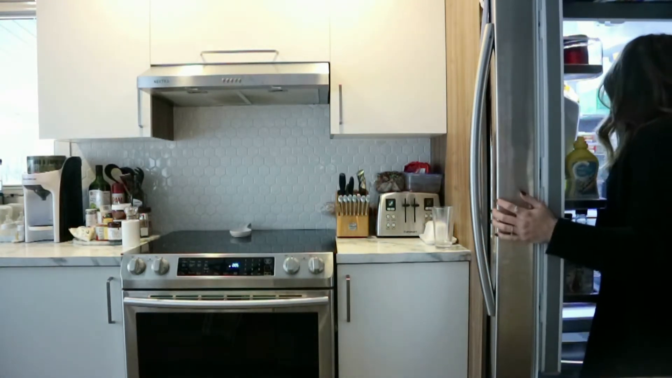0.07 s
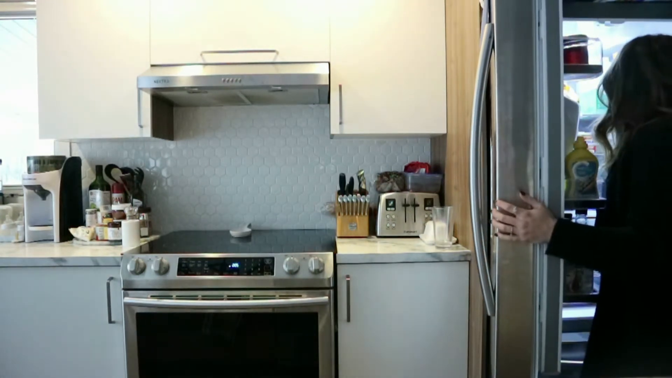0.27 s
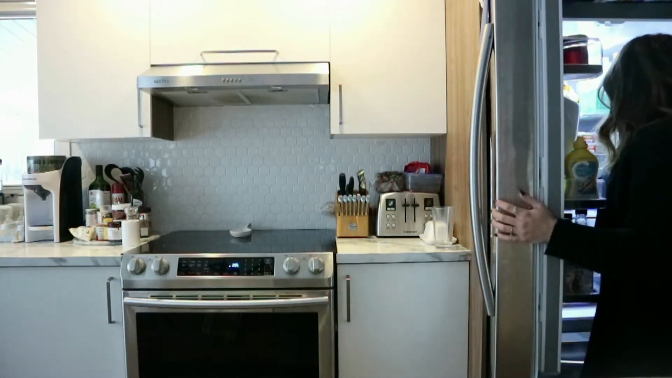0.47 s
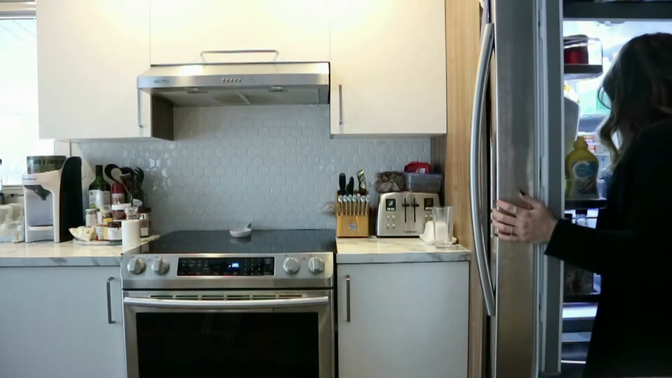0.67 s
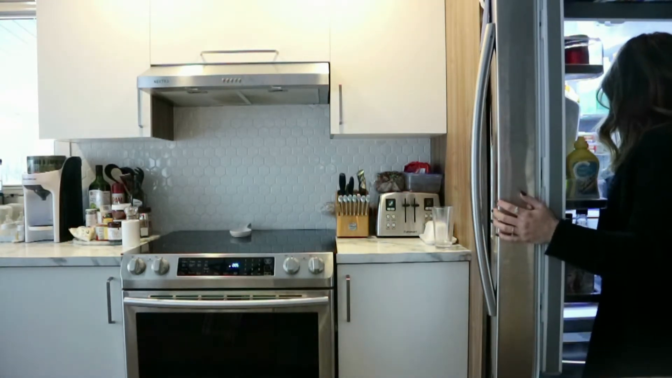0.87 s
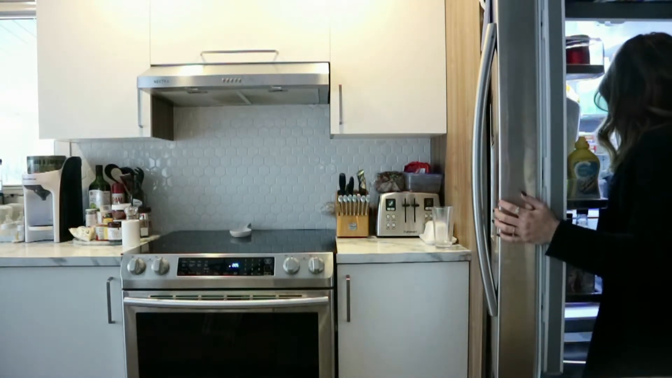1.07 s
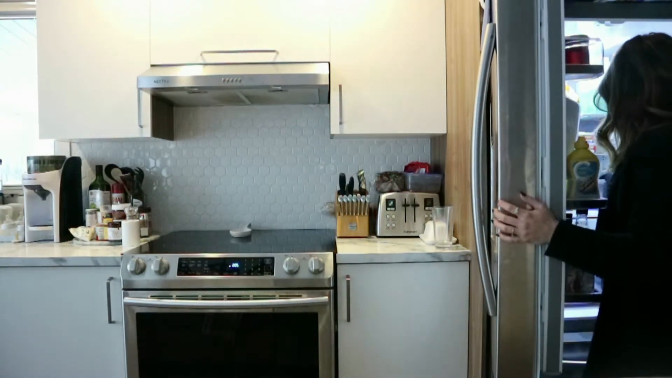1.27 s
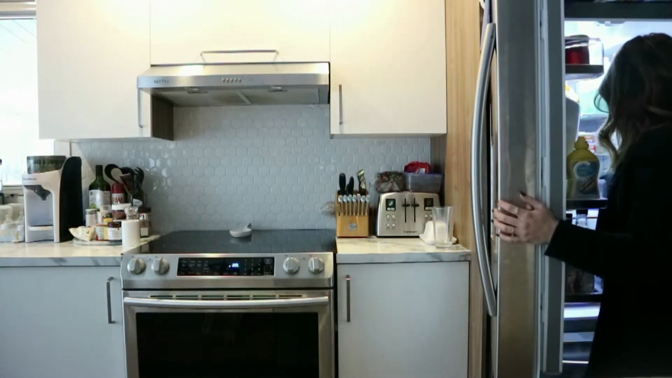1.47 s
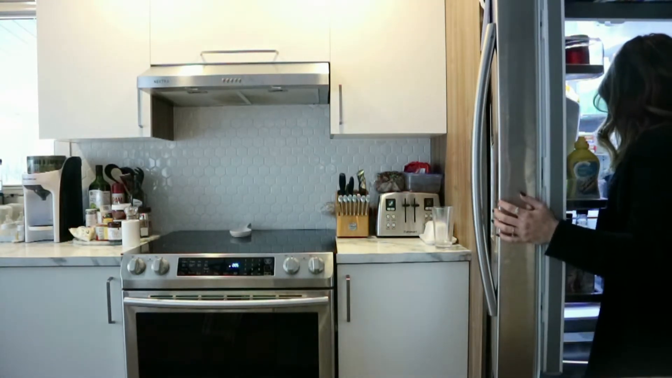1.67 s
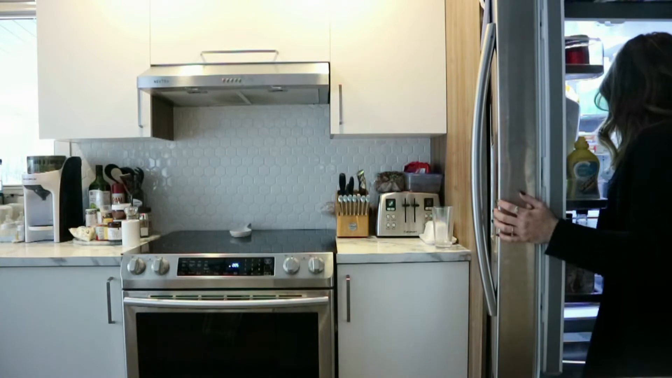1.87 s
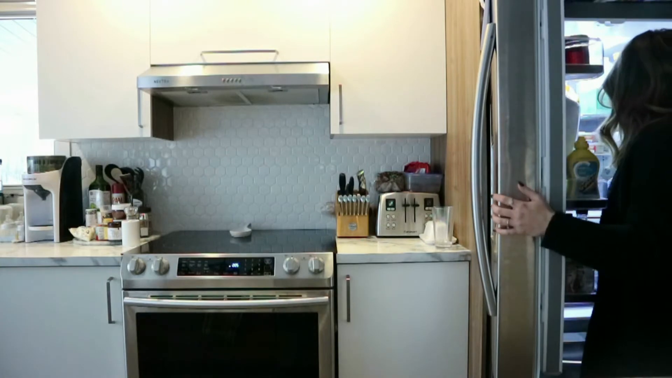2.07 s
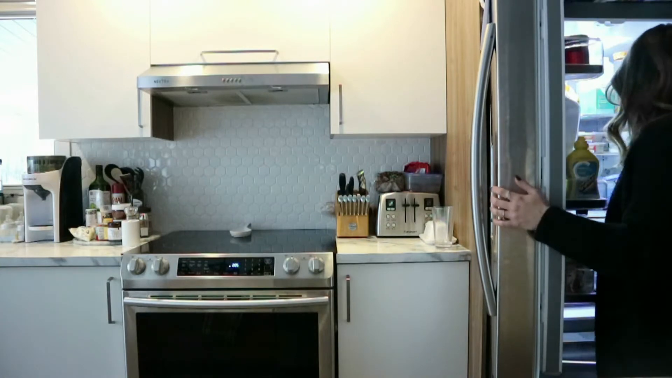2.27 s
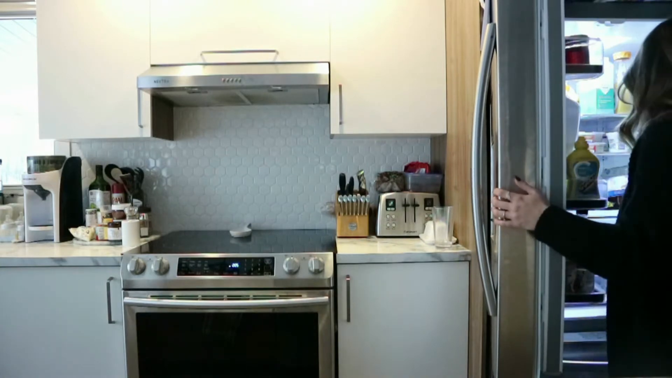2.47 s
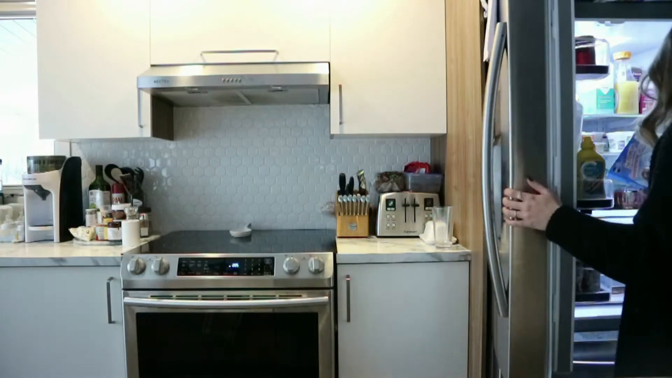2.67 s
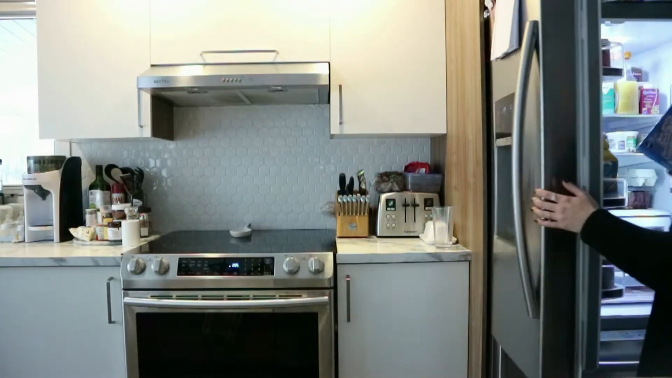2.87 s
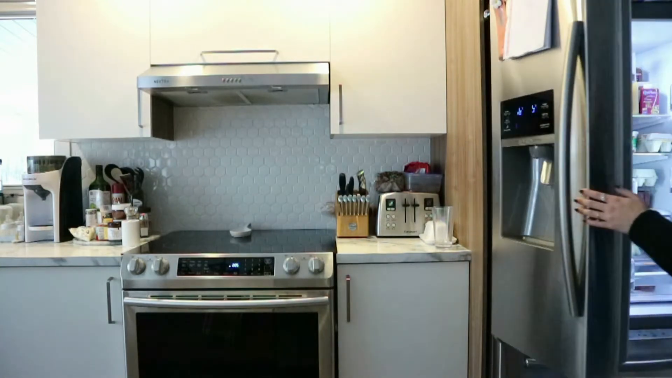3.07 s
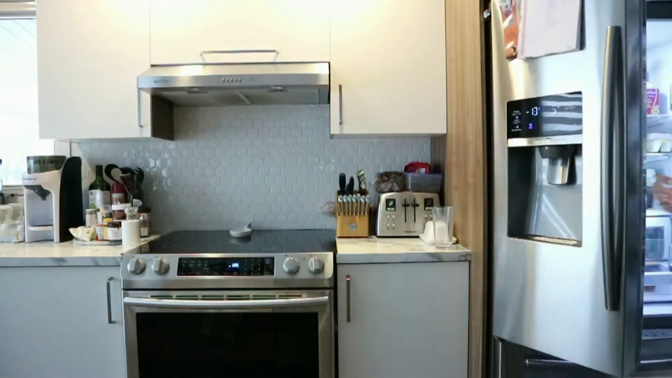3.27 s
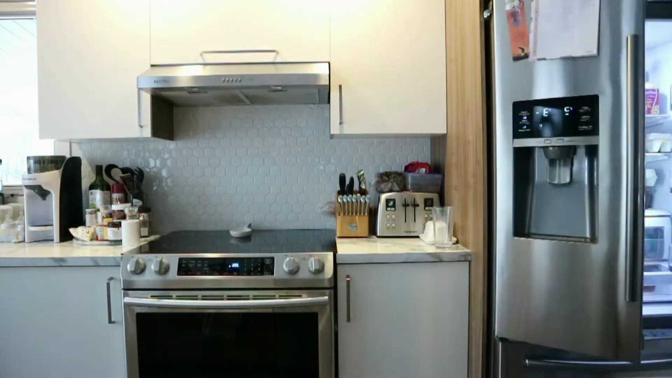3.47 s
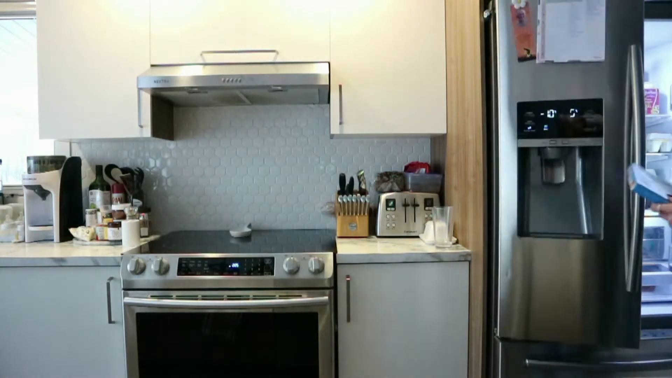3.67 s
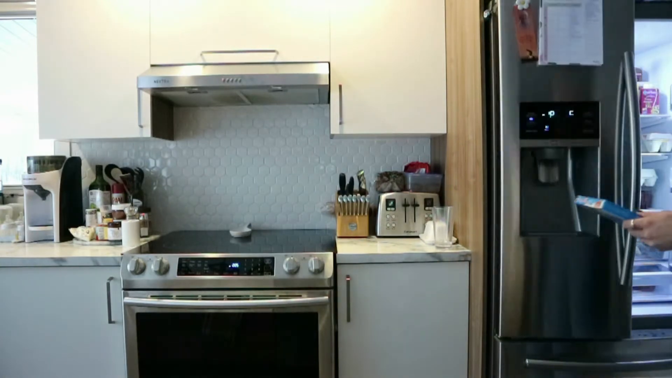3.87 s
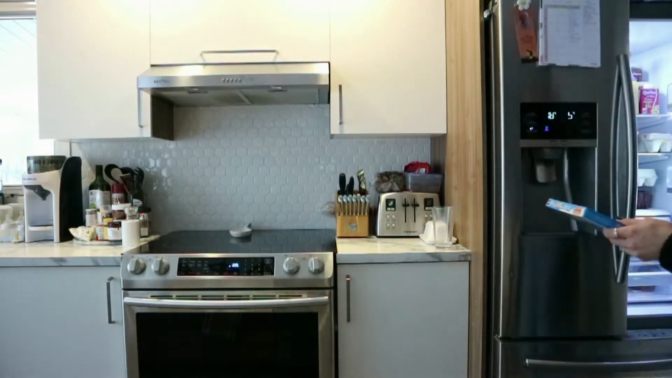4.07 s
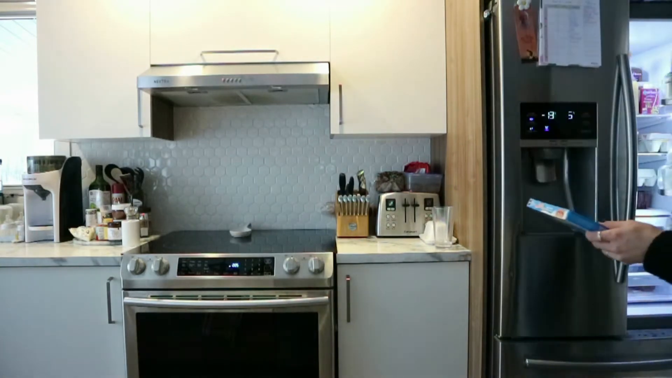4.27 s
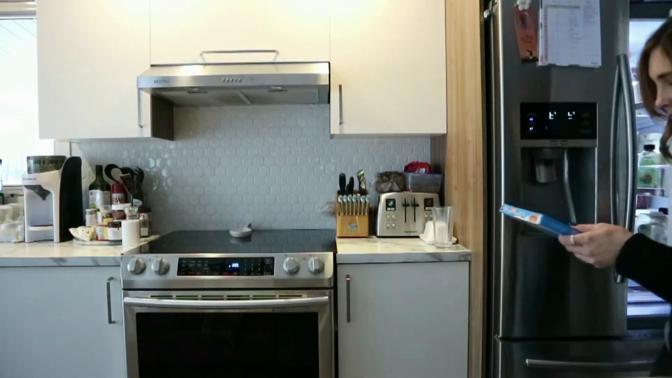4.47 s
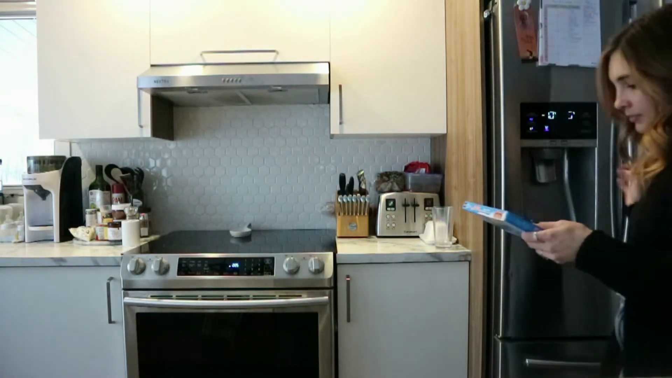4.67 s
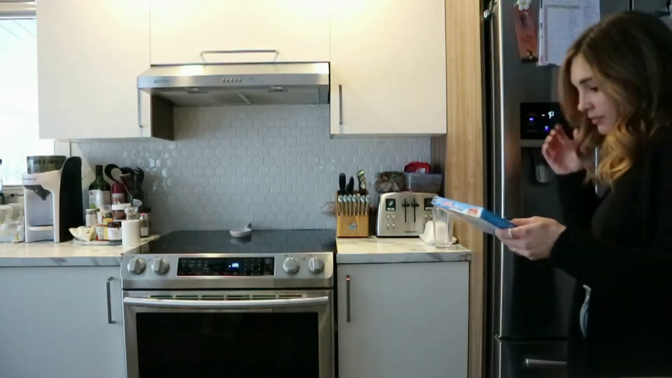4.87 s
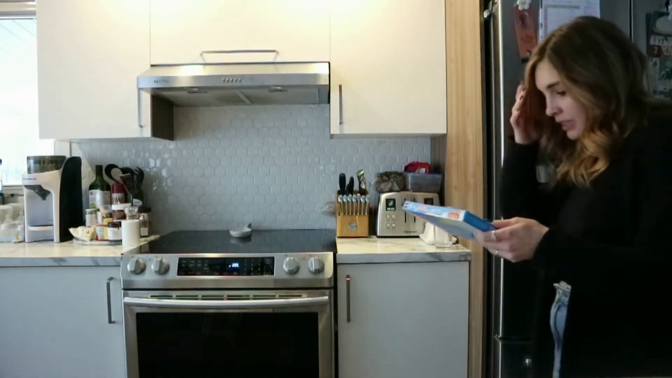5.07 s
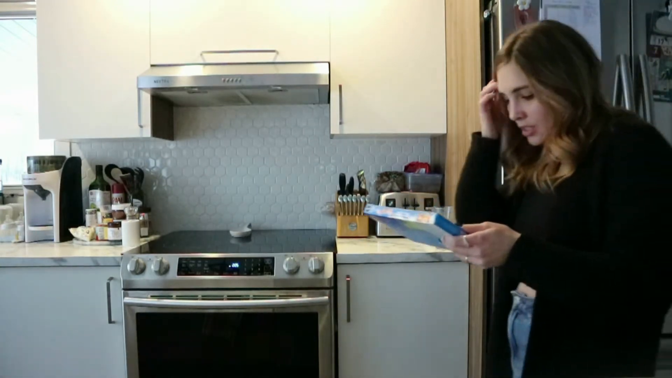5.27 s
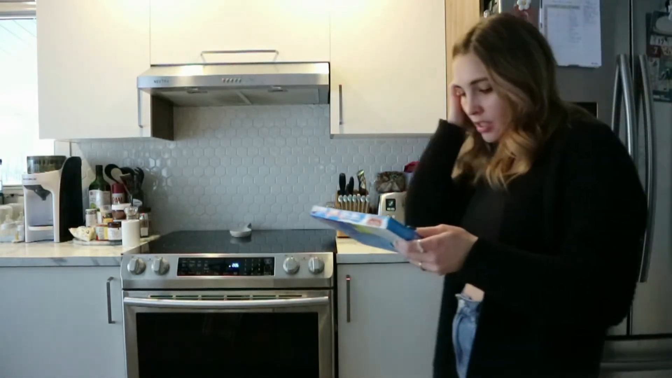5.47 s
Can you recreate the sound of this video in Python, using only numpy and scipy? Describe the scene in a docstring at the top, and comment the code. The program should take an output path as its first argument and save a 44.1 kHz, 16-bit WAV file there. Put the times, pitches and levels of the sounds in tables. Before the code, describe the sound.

Packets crinkle and plastic snaps as someone rummages in a refrigerator, a cardboard box scrapes out, then one door rattles shut and another slams.

```python
"""Packets crinkle as someone rummages in a two-door refrigerator in a small, hard-walled kitchen.
Plastic snaps, containers knock on the shelves, and a cardboard box is dragged out with a stick-slip scrape.
The first door swings shut and its bottles and jars rattle; then the second door slams.
Rubbing is coloured grains, blows are ringing modes plus fading noise; dense echoes surround most of it."""
import sys
import numpy as np
from scipy import signal
from scipy.fft import rfft, irfft
from scipy.io import wavfile
from scipy.ndimage import map_coordinates

SR = 44100
rng = np.random.default_rng(int(sys.argv[2]) if len(sys.argv) > 2 else 0)


def master_out(mix):
    """Clip the mix to full scale and print it as 16-bit PCM to the path in sys.argv[1]."""
    frames = np.transpose(np.atleast_2d(mix))
    ceiling = np.clip(frames, -1, 1)
    pcm = np.round(ceiling * 32767).astype(np.int16)
    wavfile.write(sys.argv[1], SR, pcm)


N = 242855
TIME = np.arange(N) / SR  # s
HZ = np.arange(N // 2 + 1) * SR / N  # bins of a full-length spectrum

# Hand taking hold of something. Each row: start in seconds, length in seconds, crinkle level in dB,
# treble in dB relative to it, papery rub in dB relative to it, shuffle on the shelf in dB.
GRABS = [(-0.015, 0.16, -40.5, -4, -6.5, -55.5), (0.088, 0.17, -42.5, 1, -3, -42),
         (0.283, 0.17, -49.5, -18, -2, -49), (0.477, 0.13, -46.5, -2.5, -3.5, -49),
         (0.606, 0.055, -45, -5, -2, -52), (0.655, 0.15, -46.5, -10, 0, -44.5),
         (0.868, 0.1, -52.5, -1, 3.5, -45), (1.088, 0.024, -50.5, -20, 2, -52),
         (1.16, 0.23, -60, -5, 1, -54.5), (1.396, 0.07, -49, -6, 3, -40),
         (1.54, 0.16, -51, -4.5, -0.5, -48.5), (1.727, 0.23, -49, -5, -1.5, -46.5),
         (2.538, 0.29, -49.5, -7.5, -4.5, -82), (2.733, 0.042, -44.5, -5, -4, -81),
         (2.84, 0.3, -51.5, -9.5, -4.5, -58), (3.474, 0.72, -46.5, -10.5, -2, -54),
         (4.483, 0.027, -43, -7, -8.5, -69), (4.54, 0.087, -61.5, -2, 2.5, -49.5),
         (4.75, 0.089, -46, -20, 3, -49), (4.84, 0.45, -50.5, -11, 3.5, -42.5),
         (5.253, 0.26, -55.5, -14, -6.5, -53), (5.411, 0.014, -49, -3, -15, -44)]
# Pull on the box as it leaves its shelf. Each row: time in seconds, level in dB.
BOX_PULL = [(2.02, -39.5), (2.076, -38.5), (2.084, -33.5), (2.168, -33), (2.184, -31), (2.294, -38.5),
            (2.422, -28), (2.432, -27), (2.52, -45.5)]
# Spectrum of the first door's clattering liner. Each row: frequency in Hz, level in dB.
FIRST_LINER = [(30, -28), (60, -8), (95, -2), (170, -1.5), (270, 0.5), (380, -1), (510, 1), (750, -7),
               (1100, -4), (1700, -9.5), (2700, -15.5), (4000, -24.5), (8000, -34), (14000, -80)]


def amp(db):
    """Decibels to gain."""
    return 10 ** (np.asarray(db) / 20)


def unit(x):
    """Scale to standard deviation 1."""
    return x / np.std(x)


def decay(t, t60):
    """Exponential fade by 60 dB in t60 seconds."""
    return np.exp(-np.log(1000) * t / t60)


def lookup(points, hz):
    """Interpolate a table on a log-frequency axis."""
    f, value = np.transpose(points)
    return np.interp(np.log(hz + 1e-3), np.log(f), value)


def band(x, lo_hz, hi_hz, order=3):
    """Butterworth band-pass."""
    edges_hz = [lo_hz, min(hi_hz, SR / 2 - 1)]
    return signal.sosfilt(signal.butter(order, edges_hz, "band", fs=SR, output="sos"), x)


def convolve(x, response):
    """Play a sound through an impulse response."""
    return signal.fftconvolve(x, response)[:N]


def colour(x, spectrum, size=4096):
    """Minimum-phase filter of unit energy shaped by (Hz, dB) rows."""
    gain = amp(lookup(spectrum, np.arange(size // 2 + 1) * SR / size))
    # fold the cepstrum to make the filter causal
    cepstrum = irfft(np.log(gain))
    cepstrum[1:size // 2] *= 2
    cepstrum[size // 2 + 1:] = 0
    response = irfft(np.exp(rfft(cepstrum)))
    return convolve(x, response / np.linalg.norm(response))


def grains(rate, spread_db):
    """Tiny slips and buckles of unequal size, rate per second on average; scaled to unit deviation."""
    size = amp(spread_db * np.minimum(rng.exponential(size=N), 4))
    happens = rng.random(N) < rate / SR
    return unit(happens * size * rng.choice([-1, 1], N))


def chatter(times, dbs, t60, rise_s=0.00047):
    """Each contact sets off vibrations too dense to tell apart: noise dying away as one."""
    power, t = np.zeros(N), TIME[:SR]
    np.add.at(power, (times * SR).astype(int), amp(dbs) ** 2)
    power_fade = (1 - np.exp(-t / rise_s)) * decay(t, t60) ** 2
    return np.sqrt(np.abs(convolve(power, power_fade))) * rng.standard_normal(N)


def ring(times, dbs, modes):
    """Blows ring the modes of one object as decaying sines."""
    blows, t = np.zeros(N), TIME[:SR]
    np.add.at(blows, (times * SR).astype(int), amp(dbs))
    response = sum(amp(db - 60 * t / t60) * np.sin(2 * np.pi * hz * t) for hz, db, t60 in modes)
    return convolve(blows, response / np.linalg.norm(amp(np.array(modes)[:, 1])))


def clumps(depth_db, lo_hz, hi_hz):
    """Gain that jumps about as a surface catches and gives way; rms 1."""
    gain = amp(depth_db * unit(band(rng.standard_normal(N), lo_hz, hi_hz, order=2)))
    return gain / np.sqrt(np.mean(gain ** 2))


def swell(rows, lead_s=0.012, fade_s=0.025):
    """Gain curve through (s, dB) rows, fading exponentially beyond its ends."""
    s, db = np.transpose(rows)
    outside = np.maximum((s[0] - TIME) / lead_s, (TIME - s[-1]) / fade_s).clip(0)
    return amp(np.interp(TIME, s, db)) * np.exp(-outside)


def stroke(start, length, attack_s, slope_db_per_s, release_s):
    """Gain of one movement: attack, a hold that slopes in level, release."""
    t = TIME - start
    attack = (t / attack_s).clip(0, 1)
    hold = amp(slope_db_per_s * t.clip(0, length))
    return attack * hold * np.exp(-(t - length).clip(0) / release_s)


def handling(dbs, attack_share=0.13, ease_db_per_s=9, release_s=0.024):
    """Power-summed gain of all grabs: each tightens over a share of its length, eases off, lets go."""
    power = 0
    for (start, length, *_), db in zip(GRABS, dbs):
        grip = stroke(start, length, attack_share * length, -ease_db_per_s, release_s)
        power = power + (amp(db) * grip) ** 2
    return np.sqrt(power)


def spread(mid, side, half_hz=1117.8):
    """Two close microphone ports hear diffuse bass alike and diffuse treble differently."""
    # the side's share of the power climbs to a half, and is a quarter at half_hz
    apart = .5 * HZ ** 1.5 / (HZ ** 1.5 + half_hz ** 1.5)
    mid = irfft(rfft(mid) * np.sqrt(1 - apart), N)
    side = irfft(rfft(side) * np.sqrt(apart), N)
    return np.array([mid + side, mid - side])


def packets():
    """Wrappers crinkle in fine grains and buckle in sparse ones; card and sleeves rub more smoothly beneath."""
    # Wrapper spectrum. Each row: frequency in Hz, level in dB.
    wrapper = [(590, -62), (1000, -21), (1490, -2.5), (1700, 2.5), (2310, 1.5), (2590, 4), (7430, -17),
               (12400, -29.5), (15000, -39)]
    buckles = amp(-9) * grains(rate=32, spread_db=-2.0)
    fine = grains(rate=2200, spread_db=1.5) + grains(rate=400, spread_db=-1.5)
    crinkle = colour(fine + buckles, wrapper) * clumps(depth_db=1.5, lo_hz=24.5, hi_hz=85.5)
    body = unit(band(crinkle, 1300, 5000))
    top = unit(band(crinkle, 5000, 11000))
    rub = unit(band(grains(rate=2000, spread_db=3.5), 380, 1400))
    _, _, db, treble_db, rub_db, _ = np.transpose(GRABS)
    mix = body * handling(db) + top * handling(db + treble_db) + rub * handling(db + rub_db)
    return amp(-5.0) * mix


def ticks(ring_cycles=108, width=0.34, rise_s=0.0027, edge_t60=0.024, size=16384):
    """Stiff plastic snaps, and the dragged box catching harder: a wide crack, one broad resonance and a short
    bright edge."""
    # Clearest snaps, and the box's hard catches while it is dragged out (2.08 to 2.43 s). Each row: time in
    # seconds, relative level in dB, ring pitch in Hz, sharp edge in dB relative to the snap.
    snaps = [(0.0179, -24, 4000, -7), (0.058, -18, 4500, -4.5), (0.0936, -22.5, 3060, -1),
             (0.125, -25, 2540, -3), (0.14, -25, 3300, -14), (0.164, -25, 3420, -14),
             (0.2088, -27, 2260, -28), (0.217, -31, 2610, -14), (0.2498, -26.5, 3430, -3),
             (0.334, -42, 2240, -28), (0.3477, -26.5, 3240, 0), (0.434, -45, 3000, -20),
             (0.464, -22.5, 4530, -18), (0.5188, -33.5, 3070, -3), (0.5688, -38, 2280, -20),
             (0.5927, -30, 2440, -16), (0.6225, -27.5, 2260, -11), (0.653, -46, 2200, -34),
             (0.6733, -46, 1810, -26), (0.7227, -35.5, 2590, -29), (0.7526, -37.5, 1750, -34),
             (0.7881, -25.5, 2050, -12), (0.796, -31, 3040, -14), (0.8245, -27.5, 1920, -14),
             (0.867, -42, 3630, -12), (0.8926, -37, 2100, -26), (0.9212, -37.5, 2210, -7),
             (0.928, -37, 2620, -14), (1.091, -46, 2500, -15), (1.286, -46.5, 1830, -26),
             (1.3185, -48, 1700, -32), (1.436, -32, 2020, -15), (1.5372, -42, 1700, -37),
             (1.7439, -31, 2330, -18), (1.853, -40.5, 7940, 13), (1.887, -33, 2000, -21),
             (2.0585, -23, 4660, -25), (2.082, -14.5, 4000, -11), (2.094, -19, 1780, -27),
             (2.1357, -25, 2320, -26), (2.1774, -22, 2440, -22), (2.189, -21.5, 2980, -22),
             (2.2331, -25, 3240, -24), (2.268, -25.5, 2490, -14), (2.318, -27, 2500, -18),
             (2.39, -20, 5000, -1), (2.376, -18, 2200, -22), (2.4192, -30, 2860, -24),
             (2.433, -12.5, 2370, -12), (3.047, -39, 1570, -30), (3.101, -59, 2200, -30),
             (3.146, -44, 2200, -30), (3.8277, -30, 2510, -15), (3.9385, -21.5, 2330, -48),
             (4.0364, -21, 2570, -18), (4.2575, -30.5, 2520, -49), (4.4689, -30.5, 2880, -23),
             (4.477, -29, 2980, -20), (4.771, -36, 2430, -28), (4.8013, -24.5, 4150, -30),
             (5.1574, -24, 3750, -13.5), (5.271, -35.5, 3260, -38), (5.283, -48, 3700, -29),
             (5.42, -41, 4500, -16)]
    out, t = np.zeros(N + size), TIME[:size]
    for s, db, hz, sharp_db in snaps:
        noise = rng.standard_normal(size)
        crack = amp(-3) * unit(band(band(noise, 1630, 4100, order=1), 320, 8800, order=4))
        tone = amp(-6) * unit(band(noise, hz / (1 + width), hz * (1 + width), order=2))
        edge = amp(sharp_db) * unit(band(band(noise, 10400, 30000), 5100, 6900, order=1))
        # a fixed number of cycles to -60 dB, so bright snaps are short
        snap = (crack + tone) * decay(t, ring_cycles / hz) + edge * decay(t, edge_t60)
        start = int(s * SR)
        out[start:start + size] += amp(db) * snap * (1 - np.exp(-t / rise_s)) ** .5
    return out[:N]


def box():
    """Cardboard sticks and slips as it slides past its neighbours, now and then catching harder."""
    # Cardboard spectrum. Each row: frequency in Hz, level in dB.
    cardboard = [(59, -31), (100, -14.5), (241, -2.5), (434, -12.5), (492, -5), (797, -8), (1070, -3),
                 (1160, -9), (1880, -3.5), (2860, -4.5), (10700, -19), (13200, -28), (15000, -80)]
    slips = grains(rate=2500, spread_db=1.5) + grains(rate=380, spread_db=-0.3)
    catching = clumps(depth_db=-0.5, lo_hz=27, hi_hz=79)
    return amp(-4.5) * colour(slips, cardboard) * catching * swell(BOX_PULL, lead_s=0.0087)


def shelves(push_s=0.0055, thud_t60=0.059, drag_db=-14.5):
    """Containers shuffle along; each bump swells into a short low thud with a scuff and a hollow clack."""
    # Containers set against the shelves. Each row: time in seconds, relative level in dB,
    # hollow clack in dB relative to it, pitch of the thud in Hz.
    knocks = [(0.1, -34.5, -27, 184), (0.167, -24, -10.5, 226), (0.183, -30.5, -6.5, 217),
              (0.293, -35.5, -19, 237), (0.21, -40.5, -3, 180), (0.35, -29.5, -17, 234),
              (0.694, -29, -14.5, 226), (0.754, -31, -18, 237), (0.792, -37.5, -7.5, 267),
              (0.824, -38.5, -10, 100), (1.094, -41, -23, 215), (1.117, -40, -17, 192),
              (1.322, -37.5, -10, 225), (1.346, -38.5, -22, 232), (1.382, -48, -25, 225),
              (1.416, -36, -29, 128), (1.441, -31, -10, 197), (1.624, -27.5, -16.5, 222),
              (1.641, -36, -17, 236), (1.874, -35, -21, 150), (1.939, -37, -25, 233),
              (2.021, -33.5, -11, 182), (2.097, -32.5, -2, 265), (2.431, -28.5, -24, 230),
              (3, -41.5, -15, 144), (3.632, -31, -21, 151.5), (3.656, -41.5, -29, 154),
              (4.801, -35.5, 0, 214), (5.199, -35, -4, 126), (5.407, -46.5, -7, 213)]
    # Spectra of shelf and clack. Each row: frequency in Hz, level in dB.
    shelf = [(40, -45), (80, 1), (130, -2.5), (185, 7), (235, 5), (300, -2.5), (480, -4), (900, -33.5)]
    hollow = [(150, -3.5), (330, 5.5), (500, 8.5), (720, 5.5), (1200, -8.5), (3000, -28)]
    s, db, clack_db, pitch_hz = np.transpose(knocks)
    # the shelf rumbles under the dragged box too
    movement = handling(np.array(GRABS)[:, -1]) + amp(drag_db) * swell(BOX_PULL)
    shuffle = colour(grains(rate=900, spread_db=3.0), shelf) * movement
    clack = colour(chatter(s, db + clack_db, t60=0.18), hollow)
    scuff = colour(chatter(s, db, t60=0.031), shelf)
    thuds = np.zeros(N)
    for start, thud_db, hz in zip(s, db, pitch_hz):
        t = (TIME - start).clip(0)
        push = (1 - np.exp(-t / push_s)) ** 2
        thuds += amp(thud_db) * push * decay(t, thud_t60) * np.sin(2 * np.pi * hz * t)
    return amp(-4.5) * shuffle + amp(5.0) * thuds + amp(-4.5) * scuff + amp(0.5) * clack


def squeaks(wander_hz=260, slip_hz=350):
    """A rubbed plastic wall sings briefly, its pitch jolted by random slips."""
    # Chirps. Each row: centre time in seconds, relative level in dB, pitch in Hz,
    # seconds from the centre to a fall to 1/e.
    chirps = [(0.491, -39, 1627, 0.006), (0.606, -42, 2400, 0.008), (0.623, -34, 2126, 0.006),
              (0.679, -35.5, 1887, 0.0063), (0.823, -38, 1900, 0.0046), (2.059, -32, 1955, 0.0065),
              (2.077, -33, 2146, 0.01), (2.087, -24.5, 1926, 0.0066), (2.111, -29, 1947, 0.009),
              (4.082, -15.5, 1941, 0.005), (4.769, -40.5, 2256, 0.011)]
    out = np.zeros(N)
    for s, db, hz, length in chirps:
        pitch_hz = hz + wander_hz * unit(band(rng.standard_normal(N), 34.0, slip_hz, order=1))
        tone = np.sin(2 * np.pi * np.cumsum(pitch_hz) / SR)
        out += amp(db) * tone * np.exp(-((TIME - s) / length) ** 2)
    return amp(-1.0) * out


def sleeve(rise_per_s=2, attack_s=0.013, release_s=0.012, treble_hz=3500):
    """A sleeve brushes along the door: soft swishes, gliding upwards as the arm speeds up."""
    # Swish resonances. Each row: frequency in Hz, width as a share of it, level in dB.
    resonances = [(1720, 0.64, -2), (2380, 0.075, -8), (4520, 0.19, -2.5), (7050, 0.12, -10)]
    # Passes of the sleeve. Each row: start in seconds, length in seconds, level in dB,
    # treble in dB relative, mean speed as a share of the usual.
    passes = [(2.839, 0.14, -57, -10, 1.13), (3.503, 0.024, -55, -4, 0.88), (3.551, 0.029, -41, -0.5, 0.95),
              (3.578, 0.03, -45.5, 3.5, 1.03), (3.667, 0.085, -58, -17, 0.84)]
    noise, out = rng.standard_normal(N), 0
    for s, length, db, treble_db, pace in passes:
        swish = 0
        for hz, width, level_db in resonances:
            tone = unit(band(noise, hz / (1 + width), hz * (1 + width), order=2))
            swish = swish + amp(level_db + treble_db * (hz > treble_hz)) * tone
        speed = pace + rise_per_s * ((TIME - s).clip(0, length) - length / 2)
        # reading the noise faster raises its pitch
        gliding = map_coordinates(swish, [np.cumsum(speed)], mode="mirror")
        out = out + amp(db) * gliding * stroke(s, length, attack_s, 0, release_s)
    return out


def door(blows, modes, liner, clatter_t60, crack_t60, tail_t60, clatter_tail_db, crack_tail_db):
    """A door lands: liner cracks and clatters, steel skin rings, cabinet sways; two channels."""
    # Cabinet modes. Each row: frequency in Hz, level in dB, t60 in seconds.
    cabinet = [(52.1, -2, 1), (60.4, 3, 0.41), (76, -17, 0.4)]
    # Crack spectrum. Each row: frequency in Hz, level in dB.
    sharp = [(300, -8), (900, -11), (1500, 1.5), (2100, -1), (2800, -2.5), (3800, -7.5), (6000, -13.5),
             (8500, -19.5), (14000, -35)]
    flat_lag_s, edge_db, flat_db, body_lag_s = 0.0015, -2.5, -4.5, 0.009
    s, sway_db, ring_db, clatter_db, crack_db = np.transpose(blows)
    # the edge meets first, the door lies flat a moment later, the heavy body answers last
    boom = ring(s + body_lag_s, ring_db, modes) + ring(s + body_lag_s, sway_db, cabinet)
    contacts = np.r_[s, s + flat_lag_s]
    clatter_db = np.r_[clatter_db + edge_db, clatter_db + flat_db]
    crack_db = np.r_[crack_db + edge_db, crack_db + flat_db]
    clatter = colour(chatter(contacts, clatter_db, clatter_t60), liner)
    crack = colour(chatter(contacts, crack_db, crack_t60), sharp)
    # the noise lingers between the walls, arriving from all sides
    tails = []
    for _ in range(2):
        clatter_tail = colour(chatter(contacts, clatter_db + clatter_tail_db, tail_t60), liner)
        crack_tail = colour(chatter(contacts, crack_db + crack_tail_db, tail_t60), sharp)
        tails.append(clatter_tail + crack_tail)
    return amp(-4.0) * (clatter + crack) + boom + spread(*tails)


def first_door():
    """The first door closes in a run of blows, its skin ringing at its own modes."""
    # Each row: time in seconds, then relative levels in dB of cabinet sway, door ring, liner clatter, crack.
    blows = [(3.83, -41, -60, -37.5, -47), (3.99, -50, -55, -29.5, -26.5), (4.063, -35, -28, -36, -22.5),
             (4.078, -33, -45, -12.5, -16), (4.101, -42, -19.5, -15, -33), (4.137, -32, -32, -20.5, -22),
             (4.206, -30.5, -19, -37, -42), (4.262, -48, -39, -30, -29)]
    # Each row: frequency in Hz, level in dB, t60 in seconds.
    modes = [(122.5, 11.5, 0.24), (178, -15, 0.33), (201, 6, 0.54), (249.6, 21.5, 0.45), (275, 4, 0.36),
             (304.3, 9.5, 0.49), (387, -5, 0.86), (423, -17, 0.28), (515, 5.5, 0.71), (618, -8, 0.56),
             (985, 5, 0.23), (1158, 1, 0.26), (1395, 3, 0.31), (1590, -3, 0.22)]
    return door(blows, modes, FIRST_LINER, clatter_t60=0.26, crack_t60=0.14, tail_t60=0.59,
                clatter_tail_db=-12.5, crack_tail_db=-21.0)


def second_door():
    """The second door slams with one hard blow and weaker ones after it."""
    # Each row: time in seconds, then relative levels in dB of cabinet sway, door ring, liner clatter, crack.
    blows = [(4.981, -32, -10.5, -8, -8), (5.006, -37, -53, -20.5, -29), (5.16, -45, -29.5, -43, -49)]
    # Each row: frequency in Hz, level in dB, t60 in seconds.
    modes = [(124.7, -2.5, 0.55), (133.3, -3, 0.95), (177.7, 3, 0.5), (218, 13.5, 0.08), (251.5, 4, 0.28),
             (316, -11, 0.58), (381, 3, 0.19), (500, 7, 0.26), (983, -8, 0.59), (1070, -4, 0.35),
             (1190, -25, 0.22), (1566, -11, 0.2), (2405, -12, 0.45), (2500, -10, 0.13), (2900, -24, 0.42)]
    # Liner spectrum. Each row: frequency in Hz, level in dB.
    liner = [(30, -39), (60, -20), (95, -3.5), (170, 2), (260, -1.5), (380, -6.5), (510, -3.5), (750, -5),
             (1100, -11), (1700, -13), (2700, -13), (3700, -22), (8000, -32.5), (14000, -84)]
    return door(blows, modes, liner, clatter_t60=0.21, crack_t60=0.062, tail_t60=0.51,
                clatter_tail_db=-11.0, crack_tail_db=-29.0)


def racks():
    """The loaded first door shudders through its catch; bottles touch, their notes wavering as they shake."""
    # Judder spectrum. Each row: frequency in Hz, level in dB.
    hinge = [(30, -37), (55, 5), (72, 8), (95, -11), (125, -3.5), (160, -3), (270, 1), (380, -10.5),
             (550, -3.5), (800, -4.5), (1300, -15), (2700, -19), (5000, -31), (14000, -50)]
    # Bottle contacts. Each row: time in seconds, relative level in dB, pitch in Hz, t60 in seconds.
    bottles = [(4.039, -31, 2466, 0.15), (4.084, -44, 1680, 0.5), (4.14, -38, 3560, 0.31),
               (4.209, -43, 3570, 0.33), (4.209, -34, 1660, 0.42), (4.253, -36.5, 2810, 0.37),
               (4.284, -46.5, 2595, 0.54), (4.984, -31, 2412, 0.35), (4.985, -36, 2740, 0.29),
               (4.992, -40, 2520, 0.42), (4.992, -42, 1640, 0.4), (5.006, -42, 2907, 0.37)]
    # Bottle modes, a close pair that beats. Each row: multiple of the pitch, level in dB, share of the t60.
    glass = [(1, 0, 1), (1.012, -7, 0.7)]
    catch_s, lands_s, rests_s = 3.78, 4.09, 4.325
    # rubs harder and harder into the catch, lands, then judders until it rests
    catch = amp(-42) * stroke(catch_s, lands_s - catch_s, attack_s=0.059, slope_db_per_s=18, release_s=0.013)
    shake = amp(-30) * stroke(lands_s, rests_s - lands_s, attack_s=0.013, slope_db_per_s=-28.5,
                              release_s=0.0057)
    judder = colour(grains(rate=540, spread_db=1.0), hinge) * (catch + shake)
    clinks = 0
    for s, db, hz, t60 in bottles:
        modes = [(hz * k, mode_db, t60 * share) for k, mode_db, share in glass]
        clinks = clinks + ring(np.array([s]), [db], modes)
    return amp(1.5) * judder + clinks * clumps(depth_db=2.8, lo_hz=8.5, hi_hz=45)


def jars(click_db=-12, click_t60=0.019):
    """Jars and cartons knock on shelves and racks: a short click with a hollow note."""
    # Jolts. Each row: time in seconds, relative level in dB, pitch in Hz.
    jolts = [(1.107, -48, 874), (1.32, -47, 1350), (1.539, -42, 970), (1.668, -54, 652),
             (3.406, -52.5, 1210), (3.79, -36, 546), (3.832, -35, 413), (3.912, -27.5, 322),
             (4.038, -30, 573), (4.065, -20, 305), (4.092, -15, 171), (4.103, -16.5, 613),
             (4.111, -21.5, 1235), (4.126, -21, 460), (4.137, -15, 304), (4.18, -22, 510),
             (4.216, -20, 303), (4.229, -27.5, 580), (4.254, -28, 610), (4.269, -32, 1380),
             (4.311, -38, 610), (4.322, -37, 730), (4.372, -33.5, 252), (4.983, -13, 302),
             (5.021, -29, 1060), (5.09, -30, 690), (5.132, -27.5, 526), (5.148, -31, 912),
             (5.164, -28.5, 176), (5.197, -32.5, 527)]
    # Full-jar modes. Each row: multiple of the pitch, level in dB, t60 in seconds.
    full_jar = [(1, 2.5, 0.067), (1.58, -6, 0.033), (2.31, -17, 0.048), (3.7, -15, 0.027)]
    s, db, _ = np.transpose(jolts)
    notes = 0
    for start, level_db, hz in jolts:
        modes = [(hz * k, mode_db, t60) for k, mode_db, t60 in full_jar]
        notes = notes + ring(np.array([start]), [level_db], modes)
    return notes + colour(chatter(s, db + click_db, click_t60), FIRST_LINER)


def compartment(x, t60=0.02, walls_db=-5, lowest_hz=2200, size=1024):
    """Close plastic walls scatter the treble, differently moment to moment as the hand moves; two channels."""
    hop, fade = size // 2, decay(TIME[:size], t60)
    treble = np.pad(band(x, lowest_hz, 15600, order=2), (hop, size))
    window = np.sin(np.pi * np.arange(size) / size)
    moments = np.lib.stride_tricks.sliding_window_view(treble, size)[::hop] * window
    scattered = np.zeros((2, len(treble) + size))
    for k, moment in enumerate(moments):
        walls = rng.standard_normal((2, size)) * fade / np.linalg.norm(fade)
        heard = irfft(rfft(moment, 2 * size) * rfft(walls, 2 * size))
        scattered[:, k * hop:k * hop + 2 * size] += heard
    # the direct sound gives up part of its treble
    kept = np.sqrt(1 - min(amp(walls_db), 1) ** 2 * HZ ** 4 / (HZ ** 4 + lowest_hz ** 4))
    return irfft(rfft(x) * kept, N) + amp(walls_db) * spread(*scattered[:, hop:hop + N])


def echoes(build_s=0.0019, bass_hz=330, standing_db=-16):
    """Dense reflections from cupboards and tiles, thinned in the bass, plus a few standing waves."""
    # Each row: frequency in Hz, t60 in seconds.
    room_t60 = [(100, 1), (500, 0.47), (2500, 0.42), (6000, 0.33), (12000, 0.17)]
    # Standing waves of the kitchen. Each row: frequency in Hz, level in dB, t60 in seconds.
    room_modes = [(131.2, 6, 0.53), (184, 1, 0.41), (252.7, 5, 0.12), (322, -4, 0.61), (383.8, 10, 0.24),
                  (457, -38, 0.34), (518, -6, 0.15), (626, -9, 0.42)]
    t, dense = TIME[:SR], 0
    for hz in 40 * 2. ** np.arange(9):  # octave bands
        fade = decay(t, lookup(room_t60, hz * np.sqrt(2)))
        dense = dense + band(rng.standard_normal(SR), hz, 2 * hz) * fade * hz / np.hypot(hz, bass_hz)
    dense = dense * (1 - np.exp(-t / build_s))
    standing = ring(np.zeros(1), np.zeros(1), room_modes)[:SR]
    return dense / np.linalg.norm(dense) + amp(standing_db) * standing / np.linalg.norm(standing)


def trail(left):
    """The refrigerator stands to the right, so the left port hears it with a phase lag."""
    # How far the left port trails the right. Each row: frequency in Hz, lag in radians.
    port_lag = [(200, 0.017), (1000, 0.047), (3000, 0.05), (5500, 1.54), (7500, 1.98), (10000, 2),
                (14000, 4.2)]
    return irfft(rfft(left) * np.exp(-1j * lookup(port_lag, HZ)), N)


def room_tone():
    """Faint steady air noise of the kitchen."""
    # Each row: frequency in Hz, level in dB.
    quiet = [(15, -17), (25, 1), (86, -7), (193, -2.5), (433, -9), (523, -6.5), (1080, -13.5),
             (1340, -12.5), (2770, -15), (8810, -29), (10900, -34), (12200, -85), (15500, -69)]
    return amp(-57.0) * spread(*(colour(rng.standard_normal(N), quiet) for _ in range(2)))


def scene():
    """Handling, snaps and rattle sound direct and off the walls; the doors carry their own tails."""
    inside = packets() + box() + shelves() + squeaks() + sleeve()
    snaps, rattle = ticks(), racks() + jars()
    direct = compartment(amp(0.72) * inside, walls_db=-6.5)
    direct = direct + compartment(amp(-3.5) * snaps, t60=0.013, walls_db=-8)
    direct = direct + amp(-0.5) * rattle
    to_walls = amp(-6.0) * inside + amp(-10.0) * snaps + amp(-8.5) * rattle
    reflected = spread(convolve(to_walls, echoes()), convolve(to_walls, echoes()))
    left, right = direct + first_door() + second_door() + reflected
    return np.array([trail(left), right]) + room_tone()


def record(dry, low_cut_hz=42, roll_off_hz=12500, top_hz=15800):
    """Thin the deepest bass, soften the highest treble, round the peaks, and leave nothing above top_hz."""
    rounded = np.tanh(band(dry, low_cut_hz, roll_off_hz))
    return signal.sosfilt(signal.ellip(8, .2, 80, top_hz, fs=SR, output="sos"), rounded)


dry = scene()
out = record(dry)
master_out(out)
```